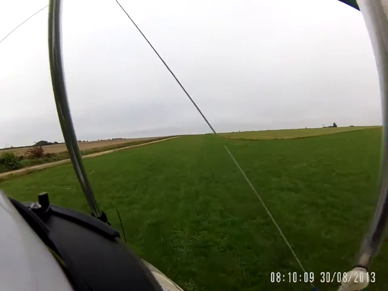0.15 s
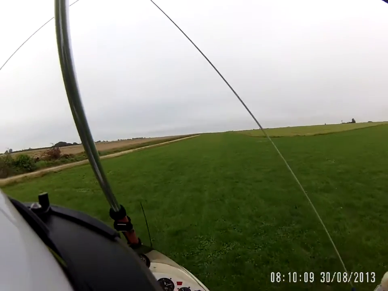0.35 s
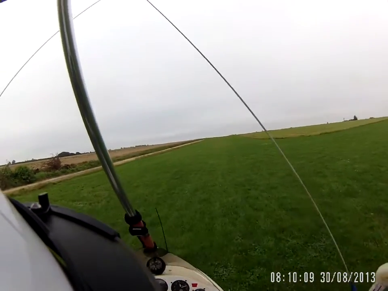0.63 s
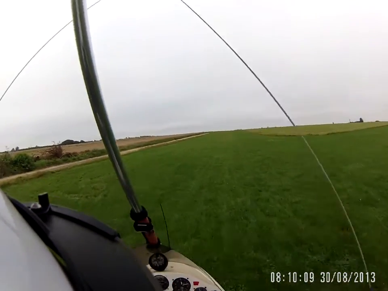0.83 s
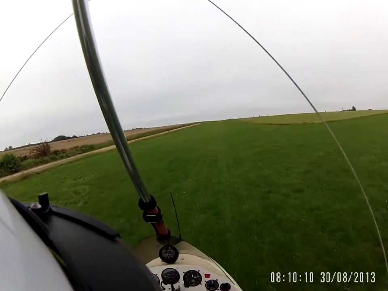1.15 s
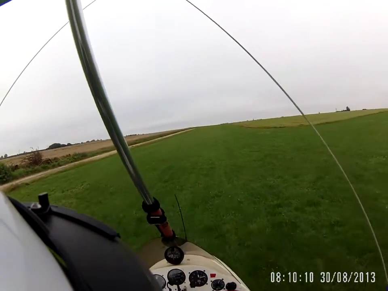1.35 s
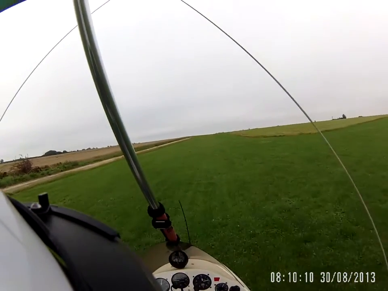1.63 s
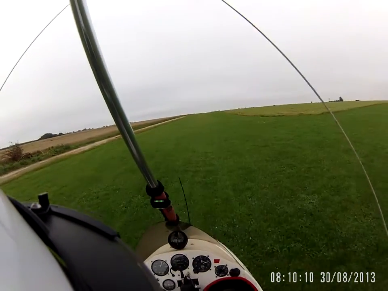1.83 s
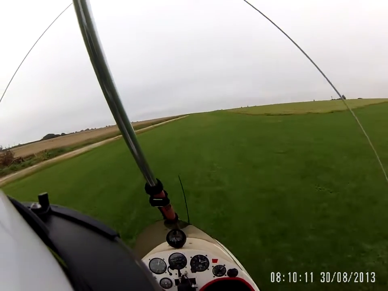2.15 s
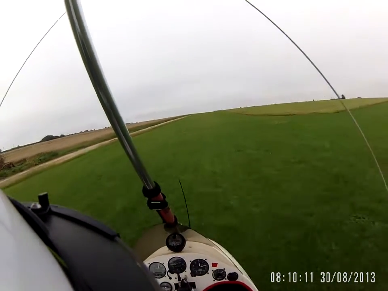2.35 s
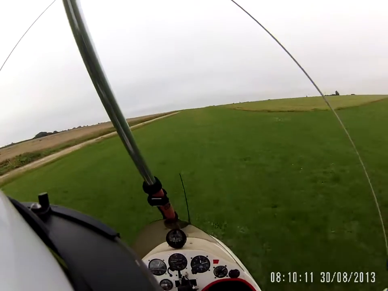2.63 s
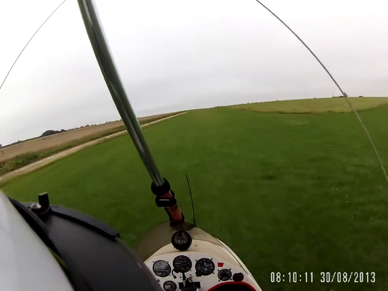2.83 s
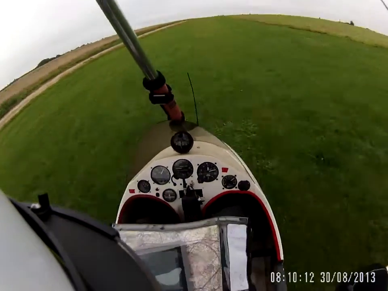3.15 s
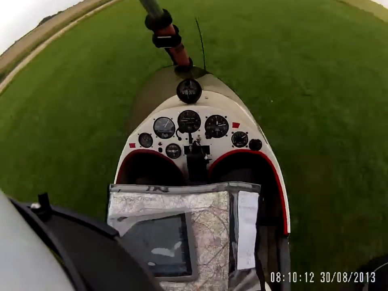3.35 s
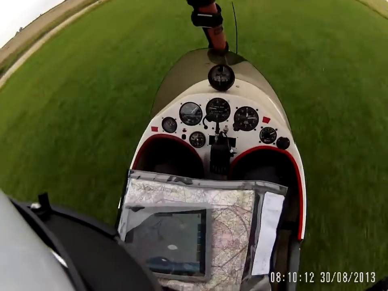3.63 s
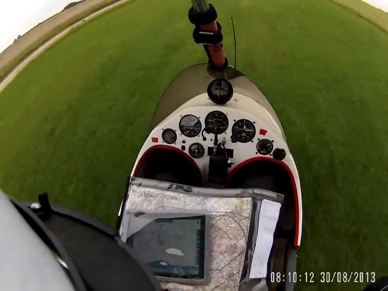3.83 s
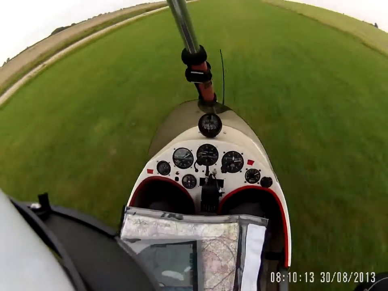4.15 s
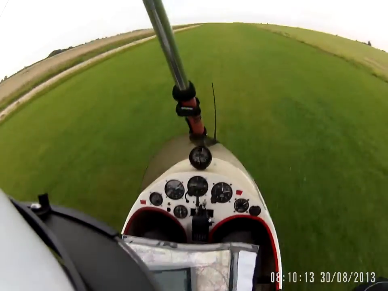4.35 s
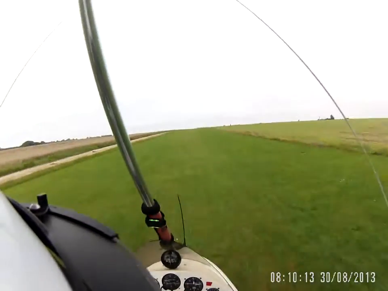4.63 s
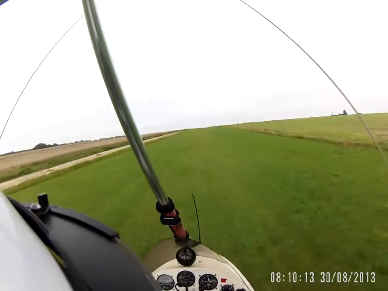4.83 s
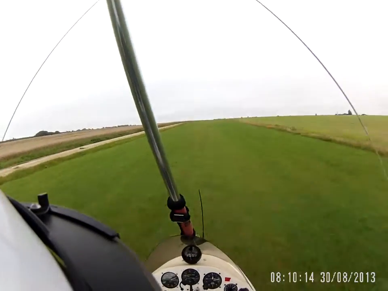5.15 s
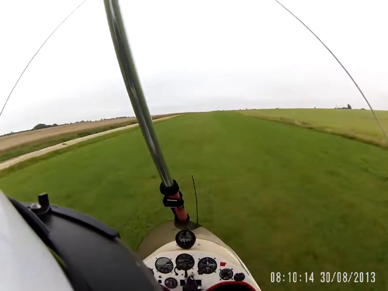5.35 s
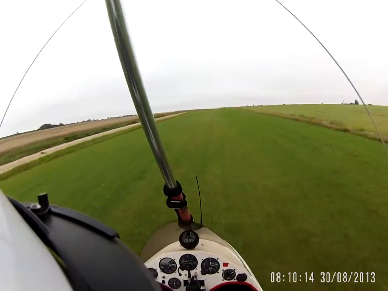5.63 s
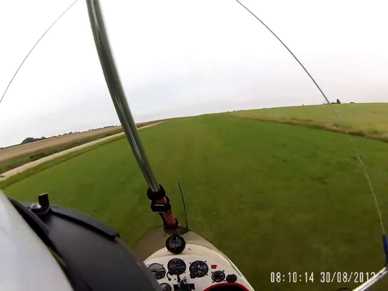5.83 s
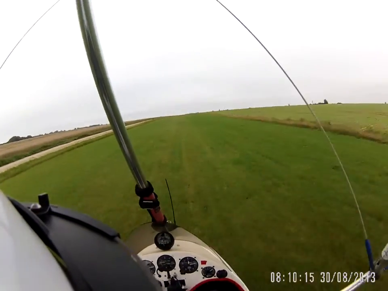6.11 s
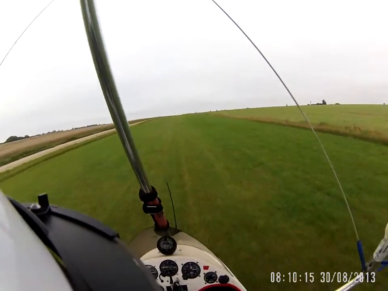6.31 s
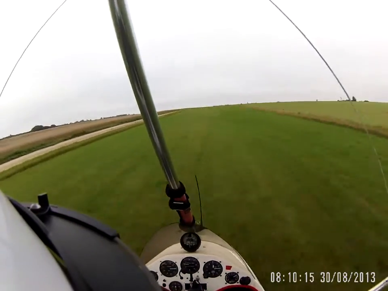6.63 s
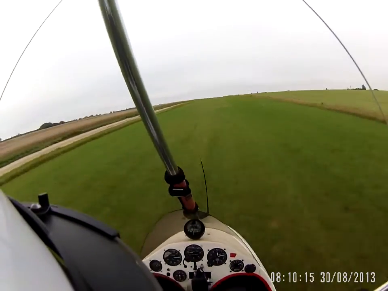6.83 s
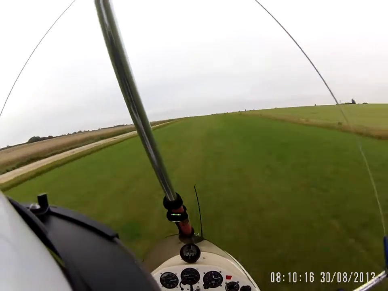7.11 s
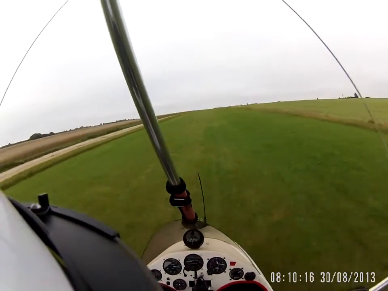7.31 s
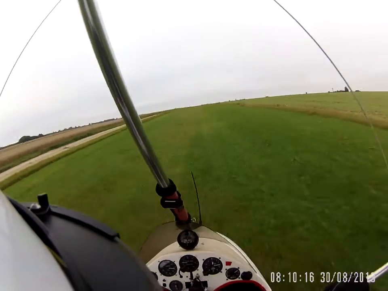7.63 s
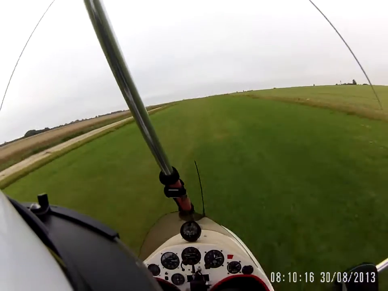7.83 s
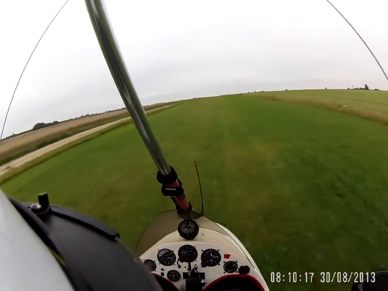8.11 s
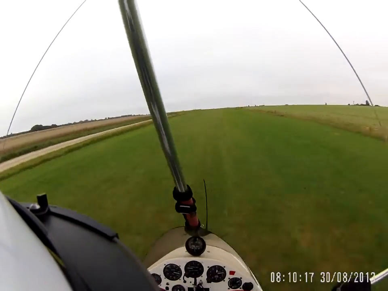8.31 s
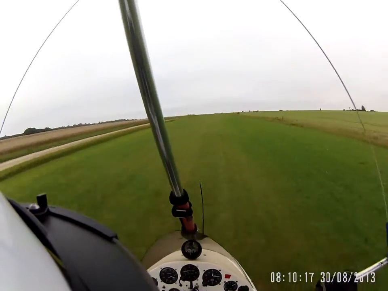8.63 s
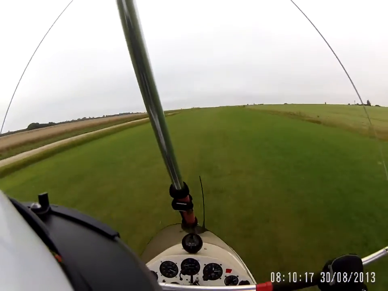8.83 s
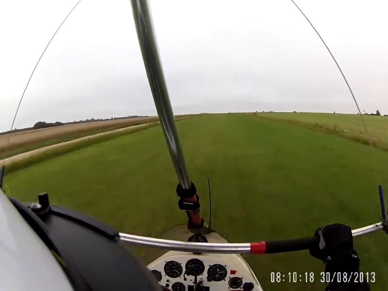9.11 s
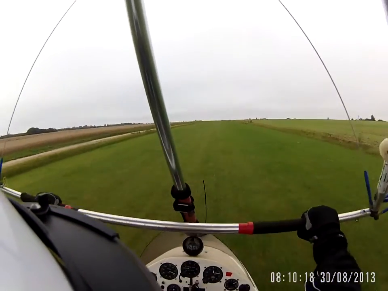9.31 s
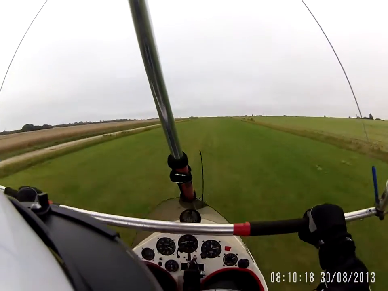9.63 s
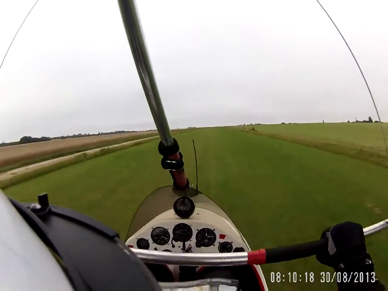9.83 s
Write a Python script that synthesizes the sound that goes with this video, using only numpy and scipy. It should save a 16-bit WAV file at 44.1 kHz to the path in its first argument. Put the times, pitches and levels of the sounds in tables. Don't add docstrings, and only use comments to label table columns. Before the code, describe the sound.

Outdoors on an open grass airstrip, a muffled helmet microphone hears a small aircraft engine behind the seat go from low idle to full throttle. The pitch sweeps up and settles into a dense, buzzing hum with fluttering propeller noise and a gear whine. When the head bows, the hiss dulls and the tone shifts. Low wind builds, and dry clicks from the casing cluster later on.

```python
import sys
import numpy as np
from scipy import signal
from scipy.fft import rfft, irfft, next_fast_len
from scipy.io import wavfile
from scipy.ndimage import map_coordinates

SR = 44100
rng = np.random.default_rng(int(sys.argv[2]) if len(sys.argv) > 2 else 0)


def volts_from_db(level):
    exponent = np.asarray(level, float) / 20
    return 10 ** exponent


def pcm_store(signal):
    levels = np.round(np.clip(np.atleast_2d(signal), -1, 1) * 32767)
    wavfile.write(sys.argv[1], SR, levels.astype(np.int16).T)


N = 439236

PINION_TEETH, WHEEL_TEETH, BLADES = 17, 59, 3
FULL_HZ, FULL_DB = 100, -12
ROLL_S, GATHER_S = 1.55, 3.86
BAR_S, BAR_DB = 8.85, -7

# time in seconds, crank speed in Hz, firing tone rms in dB.
THROTTLE = [(0, 55, -43), (.52, 55.17, -43.5), (.63, 57.1, -37), (.72, 62.6, -32.5), (.86, 70.8, -23),
            (.96, 76.4, -20), (1.1, 82.35, -15), (1.24, 86.85, -16.5), (1.4, 91, -14.5),
            (1.55, 94.16, -14.5), (1.77, 96.3, -13.5), (2, 97.05, -12.5), (2.5, 98.04, -12.5),
            (3.5, 98.56, -12), (5.2, 100.5, -11.5), (6.3, 100.7, -11), (8.3, 101, -10.5),
            (9.96, 101.6, -10.5)]
# time in seconds, bow 0-1, still gathering speed 0-1.
HEAD = [(0, 0.44, 0.1), (.6, 0.07, 0.2), (.9, 0.06, 1), (2.4, 0, 1), (2.95, 0.12, 0.99), (3.15, 1, 0.01),
        (3.8, 1.1, 0.16), (4.38, 0.83, 0.16), (4.6, 0, 0.28), (6.5, 0.06, 0.13), (7, 0.04, 0.11),
        (7.3, 0, 0.46), (7.8, 0.12, 0.43), (8.5, 0.07, 0.1), (9.2, .15, 0.18), (9.7, 0.44, 0.01),
        (9.96, 0.34, 0.01)]

# frequency in Hz, level in dB per Hz.
ROAR_COLOUR = [(50, -44), (100, -32), (150, -9.5), (200, -14.5), (254, -5.5), (404, -5.5), (553, -11),
               (620, -11.5), (720, -26), (1040, -68), (1760, -120)]
BUZZ_COLOUR = [(380, -64), (640, -14.5), (705, -6.5), (851, -10), (950, -11.5), (1150, -16), (1270, -16),
               (1345, -11), (1430, -16), (1520, -21), (1800, -22.5), (2500, -30.5), (3250, -58),
               (5500, -120)]
HISS_COLOUR = [(1290, -12), (2200, 0), (2400, -13), (2530, -4), (2750, -4.5), (3210, -0.5), (3500, -3.5),
               (3780, -3), (4440, -3), (4890, 2.5), (5690, -4.5), (6040, 1), (6550, -4), (7220, -8.5),
               (8000, 0), (10400, -34), (17600, -120)]
SWISH_COLOUR = [(4120, -33), (7000, -9), (8460, -7.5), (9280, 0.5), (9960, 0.5), (12700, -5), (15100, -26)]
WIND_COLOUR = [(15, -18), (30, -4), (55, 0), (85, -2.5), (135, 0), (250, -0.5), (400, -44)]
# frequency in Hz, gain in dB.
CASE = [(40, -36), (90, -10.5), (200, -0.5), (440, -1.5), (600, -17.5), (680, -18.5), (1000, -16),
        (1400, -35), (2000, -15), (2800, -27)]
EXHAUST = [(262, -17), (296, 6.3), (345, -11), (400, -4.5), (465, 8.5), (602, -0.6), (630, -3.5),
           (800, -19)]
FRAME = [(240, -21), (262, -3.5), (300, -0.54), (382, -16), (424, 6), (495, -1.2), (535, -18), (700, -14)]

# time in seconds, peak in dB.
TICKS = [(0.2428, -26), (0.3716, -41), (0.5576, -21), (0.6878, -35), (1.4337, -12), (2.1169, -14),
         (2.539, -18), (2.9983, -10), (5.0966, -21), (5.9882, -10), (6.0926, -11), (6.1712, -13),
         (6.2497, -10), (6.3775, -9), (6.5161, -13), (6.5826, -13), (6.6536, -13), (6.6896, -6),
         (7.214, -10), (7.238, -19), (7.5469, -13), (7.7017, -9), (8.0267, -11), (8.4841, -16),
         (8.7789, -14)]
# time in seconds, length in seconds, level in dB.
BRUSHES = [
    (5.838, .03, -49),
    (9.041, .07, -47.5),
]
# time in seconds, length in seconds, rise in dB.
BUMPS = [(5.3, .6, 5), (6.68, .12, 7), (7.2, .17, 9), (7.64, .1, 7.5), (8.0, .11, 7.5), (8.35, .08, 8),
         (8.8, .13, 7)]
# time in seconds, length in seconds, rise in dB.
UNLOADING = (9.83, .15, 10)

# level in dB, dB per dB of crank speed, gain at idle in dB, gain at take-off speed in dB.
STRONG_ORDERS = (3, 4, 5, 6, 7, 8, 10)
STRONG_LEVELS = [(-24.5, -1, -37, 5), (-23.5, 1.3, 1.5, 6.5), (-22.5, 3, -25, 0), (-18.5, 3, -5, -4),
                 (-35, -1, -11, 3), (-33, 0.25, -18, -2), (-22.5, 6, 5.5, -14.5)]
# order, rms in dB, gain with the head bowed in dB,
# gain while gathering speed in dB.
WEAK_ORDERS = [(1.01, -46, -2, -4), (9, -44, 2, 2), (11, -57.5, 1, 6), (12, -55, 5, 7), (13, -56, -13, 8),
               (14, -54.5, 7, -11), (15, -63, 19, -1), (16, -54.5, 8, -9), (18, -66, 2, 18),
               (19, -63, 8, 4), (20, -70.5, 13, 14), (20.8, -62.5, 8, -2), (22, -72, 17, -9),
               (25.8, -66.5, 7, -5), (31, -58, -12, -16), (38, -62.5, -4, 2)]
# harmonic, level in dB.
BLADE_HARMONICS = [(2, -2), (3, -1.5), (4, -3.5), (5, 3.5), (6, 6.5), (8, 12), (9, 8.5), (10, 1.5)]
# steps of the blade rate, rms in dB, gain with the head bowed in dB.
MESH_SIDEBANDS = [(-3, -56.5, 3), (-1, -50.5, -13), (1.5, -64, -4.5), (0, -56, 12), (2.5, -54.5, 3),
                  (3.5, -61, -5), (8, -58, 0)]
# steps of the blade rate, level in dB, gain at take-off speed in dB.
TOP_SIDEBAND = (8, -76, 21)
CHOPPED_ORDERS = (3, 5, 14, 34)

# level in dB, dB per dB of drive, gain with the head bowed in dB,
# gain while gathering speed in dB, gain at take-off speed in dB.
ROAR_RULE = (-29, 0.35, 1, 1.3, 0.9)
BUZZ_RULE = (-32.5, 0.45, -0.9, 0.5, -2.8)
LOAD_RULE = (-0.089, 0.65, -1.6, .3, -1)
WIND_RULE = (-50.5, .3, 1.5, 3, 20)
BLADE_RULE = (-31.5, 2, 2.5, 8, -7.5)
BEAT_RULE = (-39, 1.35, -.2, 1, 3)
GEAR_RULE = (-48, 2.2, 10.5, 2.5, -12)
CHOP_RULES = [(-55.5, 0.71, 0.5, 2, 25), (-49.5, .6, -1, 9.5, 8.4), (-58.5, .55, -23, 0, 16),
              (-61, .6, -13, -1.2, 1.2)]
TILT_RULE = (0.9, 0.1, -0.35, -1, -2)
ROUGH_RULE = (1.9, 0.012, 0.44, 2.3, 0.38)
HISS_RULE = (-41.5, 3.5, -5.5, -1.5, -7)
SWISH_RULE = (-32, 4.5, -6.5, -3.5, -9.5)


def unit(x):
    return x / np.sqrt(np.mean(x ** 2) + 1e-20)


def along(points, hz):
    f, v = np.transpose(points)
    return np.interp(np.log(hz + 1), np.log(f + 1), v)


def curves(rows):
    s, *cols = np.transpose(rows)
    return [np.interp(np.arange(N) / SR, s, c) for c in cols]


def wobble(rate):
    knots = rng.standard_normal(int(N * rate / SR) + 4)
    return map_coordinates(knots, [np.arange(N) * rate / SR], order=1)


def coloured(x, spectrum):
    m = next_fast_len(N + 8192)
    gain = volts_from_db(along(spectrum, np.fft.rfftfreq(m, 1 / SR)))
    return unit(irfft(rfft(x, m) * gain, m)[:N])


def tone(turns, db, shake_db, drift, rate, start=None):
    start = rng.uniform(0, 2 * np.pi) if start is None else start
    size = np.sqrt(2) * volts_from_db(db + shake_db * wobble(rate))
    return size * np.sin(2 * np.pi * turns + start + drift * wobble(rate))


def swell(s, length, db):
    return db * np.exp(-((np.arange(N) / SR - s) / length) ** 2)


def shafts():
    hz = curves(THROTTLE)[0]
    return hz, np.cumsum(hz) / SR, BLADES * PINION_TEETH / WHEEL_TEETH


def controls():
    hz, firing_db = curves(THROTTLE)
    rolling = 1 - np.exp(-np.maximum(np.arange(N) / SR - ROLL_S, 0) / GATHER_S)
    return firing_db - FULL_DB, 20 * np.log10(hz / FULL_HZ), rolling


def level(rule, drive_db):
    db, follows, bow_db, early_db, rolling_db = rule
    bow, early = curves(HEAD)
    return db + follows * drive_db + bow_db * bow + early_db * early + rolling_db * controls()[2]


def shaded():
    return np.clip((np.arange(N) / SR - BAR_S) / 0.14, 0, 1)


def air():
    _, turns, blade = shafts()
    effort_db, speed_db, _ = controls()
    roar_db, buzz_db = level(ROAR_RULE, effort_db) + 1.5, level(BUZZ_RULE, effort_db) - 1.0
    wind_db = level(WIND_RULE, effort_db) + 4
    hiss_db = level(HISS_RULE, speed_db) + 3.5
    swish_db = level(SWISH_RULE, speed_db) + 0.22 * BAR_DB * shaded() + 1.47

    shaft = 2 * np.pi * blade * turns / BLADES
    puffs_db = 1.17 * np.cos(shaft) + 0.42 * np.cos(2 * shaft)
    puffs_db = puffs_db + 1.4 * np.cos(BLADES * shaft) + 0.6 * np.cos(2 * BLADES * shaft)
    once = np.cos(2 * np.pi * turns)
    firing = np.cos(2 * 2 * np.pi * turns)
    gust = wobble(16)
    bursts_db = 0.87 * level(ROUGH_RULE, effort_db) * np.tanh(wobble(70))

    noise = rng.standard_normal((5, N))
    roar = coloured(noise[0] * volts_from_db(0.63 * wobble(22) + 0.6 * bursts_db), ROAR_COLOUR)
    buzz = coloured(noise[1] * volts_from_db(2.0 * firing + 1.2 * once + bursts_db), BUZZ_COLOUR)
    hiss = coloured(noise[2] * volts_from_db(0.61 * puffs_db + 0.45 * firing + 0.81 * gust), HISS_COLOUR)
    flutter_db = puffs_db + 0.89 * firing + 0.46 * gust + 0.64 * wobble(300)
    swish = coloured(noise[3] * volts_from_db(flutter_db), SWISH_COLOUR)
    wind = coloured(noise[4] * volts_from_db(1.5 * wobble(7.4)), WIND_COLOUR)
    exhaust = volts_from_db(roar_db) * roar + volts_from_db(buzz_db) * buzz
    return exhaust + volts_from_db(hiss_db) * hiss + volts_from_db(swish_db) * swish + volts_from_db(wind_db) * wind


def rattle():
    ticks, t = np.zeros(N + SR), np.arange(SR // 50) / SR
    bright = signal.butter(4, [8300, 12500], "bandpass", fs=SR, output="sos")
    for s, db in TICKS:
        click = signal.sosfilt(bright, rng.standard_normal(len(t)))
        ticks[round(s * SR):][:len(t)] += volts_from_db(db - 9.5 - 60 * t / 0.02) * click
    stroke = sum(swell(s, length, volts_from_db(db)) for s, length, db in BRUSHES)
    cloth_colour = [(1800, -50), (2700, 5.5), (3500, -1), (5000, -15), (6500, -50)]  # Hz, dB
    return ticks[:N] + stroke * coloured(rng.standard_normal(N), cloth_colour)


def gearbox():
    _, turns, blade = shafts()
    effort_db, _, rolling = controls()
    bow = curves(HEAD)[0]
    bumps_db = sum(swell(*bump) for bump in BUMPS)
    gear_db = level(GEAR_RULE, np.maximum(effort_db, -5.5)) + BAR_DB / 2 * shaded() + bumps_db
    load_db = level(LOAD_RULE, effort_db) + 0.15 * bumps_db
    whine = tone(PINION_TEETH * turns, gear_db, 0.62, 0.15, rate=3.7)

    step, db, rolling_db = TOP_SIDEBAND
    top_db = db + load_db + rolling_db * rolling
    whine = whine + tone((PINION_TEETH + step * blade) * turns, top_db, 1.7, 0.2, rate=1.97)
    for k, db, bow_db in MESH_SIDEBANDS:
        step = round(k)
        side_db = load_db + db + bow_db * bow
        if step == -1:
            side_db = side_db + swell(*UNLOADING)
        whine = whine + tone((PINION_TEETH + step * blade) * turns, side_db, 3.57, 0.22, rate=3.5)
    return whine


def propeller():
    hz, turns, blade = shafts()
    effort_db = controls()[0]
    beat_db = level(BEAT_RULE, np.maximum(effort_db, -10.5))
    blade_db = level(BLADE_RULE, np.maximum(effort_db, -6.5))
    tilt_db = level(TILT_RULE, effort_db)
    out = tone(blade * turns, beat_db, 1.4, 0.2, rate=14)
    for k, db in BLADE_HARMONICS:
        harmonic_db = db + blade_db + tilt_db * (k - 3) + along(CASE, k * blade * hz)
        out = out + tone(round(k) * blade * turns, harmonic_db, 2.4, 0.34, rate=12)

    steps = (-blade, blade, -blade, -2 * blade)
    for k, step, rule in zip(CHOPPED_ORDERS, steps, CHOP_RULES):
        chop_db = level(rule, effort_db) + BAR_DB * shaded() * (k > 5)
        out = out + tone((k + step) * turns, chop_db, 1.2, 0.28, rate=9)
    return out


def engine():
    hz, turns, _ = shafts()
    effort_db, speed_db, rolling = controls()
    bow, early = curves(HEAD)
    idling = np.clip((57 - hz) / 2.0, 0, 1)
    matched = np.clip((61.5 - hz) / 3.5, 0, 1)
    uneven = 1 + 3 * idling
    out = tone(2 * turns, FULL_DB + effort_db, 0.2 * uneven, 0.027 * uneven, rate=23, start=0)

    for k, (db, follows, idle_db, rolling_db) in zip(STRONG_ORDERS, STRONG_LEVELS):
        odd = k % 2
        idle = matched if odd else idling
        ring_db = along(FRAME if odd else EXHAUST, k * hz)
        order_db = db + follows * speed_db + idle_db * idle + rolling_db * rolling + ring_db
        blur = uneven ** (k < 10)
        out = out + tone(k * turns, order_db, 0.8 * blur, 0.08 * blur, rate=22, start=1.1 * odd)

    load_db = level(LOAD_RULE, effort_db)
    for k, db, bow_db, early_db in WEAK_ORDERS:
        case_db = 0.42 * (along(CASE, k * hz) - along(CASE, k * hz[-1]))
        order_db = db + load_db + bow_db * bow + early_db * early + case_db
        out = out + tone(round(k) * turns, order_db, 1.1, 0.29, rate=7)
    return out


def scene():
    return (air() + rattle() + gearbox() + propeller() + engine())[None]


def low_pass(x):
    return signal.sosfilt(signal.butter(12, 15220, fs=SR, output="sos"), x)


def record(dry):
    fade = np.minimum(np.arange(N, 0, -1) / (0.003 * SR), 1)
    return low_pass(dry * fade)


dry = scene()
out = record(dry)
pcm_store(out)
```